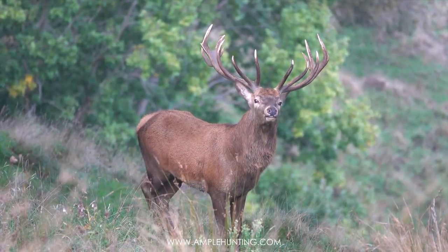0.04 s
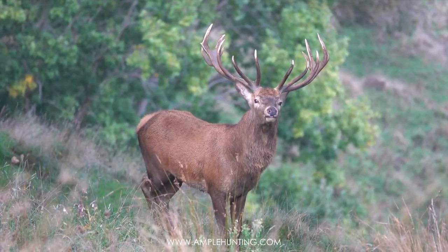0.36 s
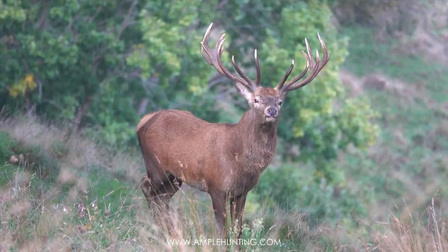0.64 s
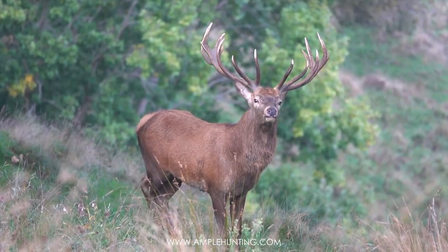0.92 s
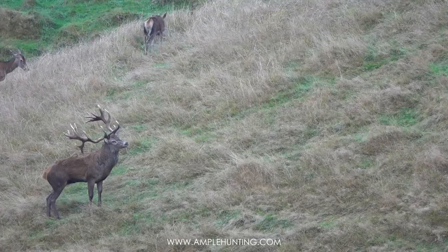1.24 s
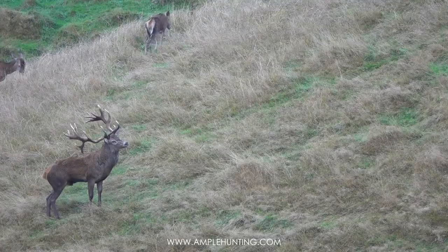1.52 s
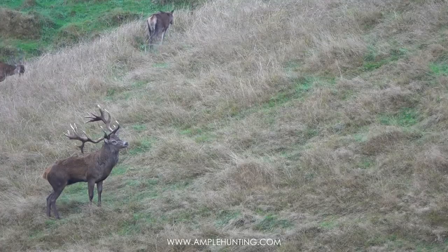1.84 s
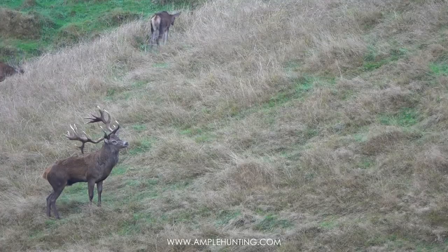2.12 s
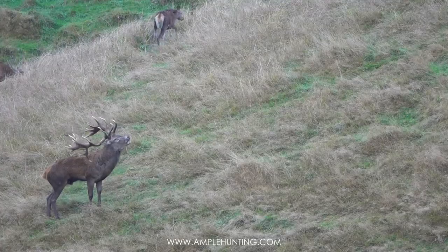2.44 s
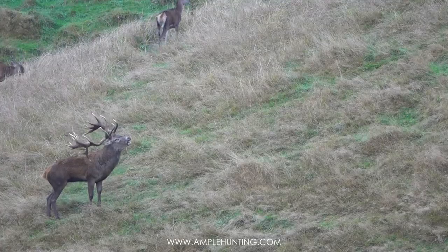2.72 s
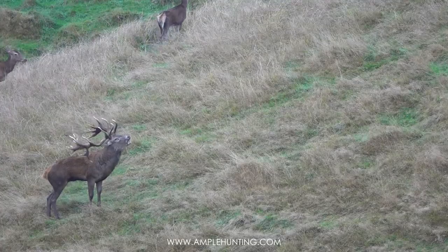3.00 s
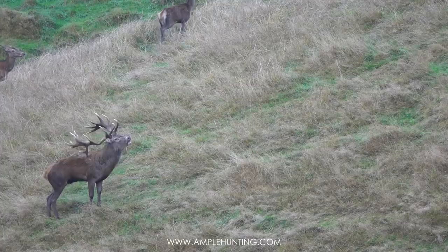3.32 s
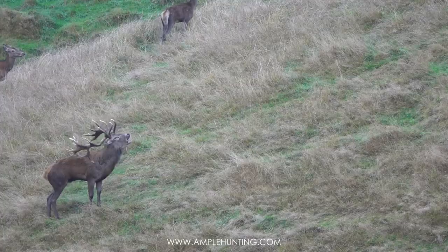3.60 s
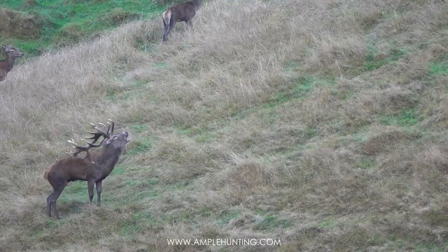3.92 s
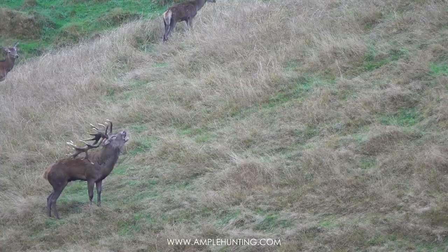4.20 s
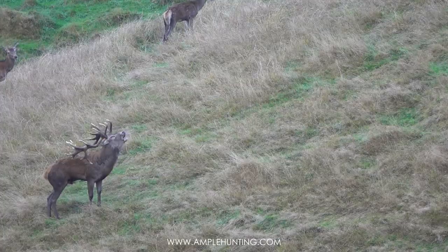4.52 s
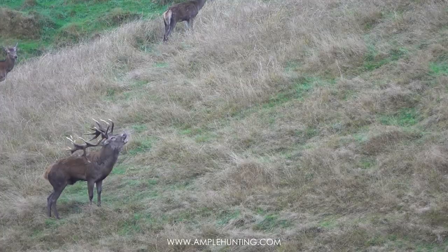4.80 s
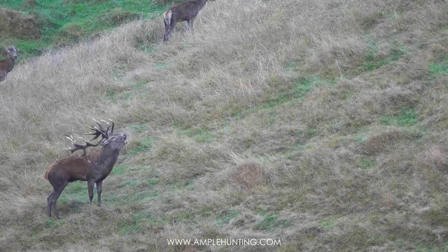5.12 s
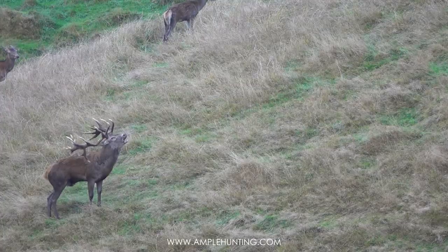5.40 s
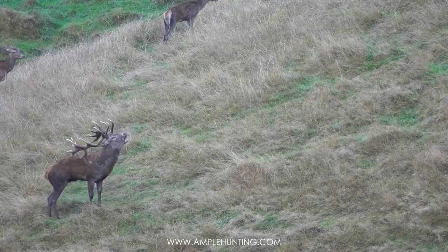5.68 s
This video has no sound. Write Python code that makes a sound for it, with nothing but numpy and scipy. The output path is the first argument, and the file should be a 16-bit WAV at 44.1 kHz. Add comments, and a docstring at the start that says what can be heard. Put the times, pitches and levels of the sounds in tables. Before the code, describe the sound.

At a wood edge, a songbird chirps over a breeze on the microphone and a faint, distant stag. This fades into an open hillside with softly rustling grass, a fluting bird and a very faint high twitter. A nearby red deer stag then gives two loud, harsh grunts and one long, throaty roar, and just begins another.

```python
"""Red deer stag roaring on a hillside.

A breezy wood edge with a chirping songbird and a far stag fades out. An open hillside fades in:
rustling grass, a fluting bird, a thin high twitter. A near stag gives two harsh grunts, one long
roar, and starts another. Uneven pulses of its vocal folds ring a throat that lengthens as it calls.
This stag and the hillside's noise pass through a microphone that rings near 3.4 kHz."""
import sys
import numpy as np
from scipy import signal
from scipy.fft import rfft, irfft, next_fast_len
from scipy.io import wavfile
from scipy.ndimage import map_coordinates

SR = 44100
rng = np.random.default_rng(int(sys.argv[2]) if len(sys.argv) > 2 else 0)


def int16_out(signal):
    """Quantize to a 16-bit WAV file."""
    q = np.round(np.clip(np.atleast_2d(signal).T, -1, 1) * 32767)
    wavfile.write(sys.argv[1], SR, q.astype(np.int16))


N = 253575
T = np.arange(N) / SR
WOOD_END_S, HILL_START_S = 1.295, 1.33


def amp(db):
    """Decibels to gain."""
    return 10 ** (np.asarray(db) / 20)


def unit(x):
    """x at rms 1."""
    return x / np.sqrt(np.mean(x ** 2) + 1e-20)


def during(start, end, attack_s, release_s):
    """Envelope: rises from start, holds at 1, reaches zero at end."""
    return np.clip(np.minimum((T - start) / attack_s, (end - T) / release_s), 0, 1)


def along(points, hz):
    """Gain through (Hz, dB) points on a log axis."""
    point_hz, db = np.transpose(points)
    return amp(np.interp(np.log(hz + 1), np.log(point_hz + 1), db))


def resonances(modes, hz):
    """Gain of steep peaks with faint, wide skirts."""
    return sum(amp(db) / (1 + ((hz - centre) / width) ** 2) ** 2
               + amp(db - 47.5) / (1 + ((hz - centre) / (4 * width)) ** 2)
               for centre, width, db in modes)


def filtered(x, response):
    """x through a zero-phase gain of frequency."""
    size = next_fast_len(N + SR // 2)
    return irfft(rfft(x, size) * response(np.fft.rfftfreq(size, 1 / SR)), size)[:N]


def noise(spectrum):
    """Coloured noise at rms 1."""
    return unit(filtered(rng.standard_normal(N), lambda hz: along(spectrum, hz)))


def wobble(knots_per_s):
    """Smooth random curve."""
    return map_coordinates(rng.standard_normal(int(N * knots_per_s / SR) + 4), [T * knots_per_s])


def steady(x):
    """x with its slow level held at 1; single pulses keep their contrast."""
    window = signal.windows.hann(SR // 18)
    power = signal.fftconvolve(x ** 2, window / window.sum(), "same")
    return x / np.sqrt(np.abs(power) + 1e-12)


def impulses(times_s, sizes):
    """One-sample pulses at the given times."""
    return np.bincount(np.clip(np.round(times_s * SR).astype(int), 0, N - 1), sizes, N)


def outdoors(x, t60_s, wet_db):
    """x plus the diffuse echo of slopes and trees."""
    t = T[:SR]
    tail = rng.standard_normal(SR) * amp(-60 * t / t60_s) * (1 - np.exp(-t / 0.0068))
    return x + amp(wet_db) * signal.fftconvolve(x, tail / np.linalg.norm(tail))[:N]


def slur(start_s, length_s, from_hz, to_hz, db, bend):
    """A note for whistles(); bend is the share of the glide done halfway."""
    return start_s, length_s, from_hz, from_hz + bend * (to_hz - from_hz), to_hz, db


def whistles(notes, flutter):
    """Pure tones, each gliding through three pitches with a random flutter."""
    song = np.zeros(N + SR)
    unsteady = 1 + flutter * wobble(300)
    for start_s, length_s, *pitches_hz, db in notes:
        progress = np.linspace(0, 1, int(length_s * SR))
        at = max(round(start_s * SR), 0)
        span = slice(at, at + len(progress))
        hz = np.polyval(np.polyfit([0, .5, 1], pitches_hz, 2), progress) * unsteady[span]
        envelope = np.sqrt(2 * np.abs(np.sin(np.pi * progress)))
        song[span] += amp(db) * envelope * np.sin(2 * np.pi * np.cumsum(hz) / SR)
    return song[:N]


# Spectra of wind on the microphone and in leaves. Each row: frequency in Hz, relative level in dB.
BUFFET_SPECTRUM = [(7.1, -18), (12, 15.5), (20, 1.5), (30, 0.5), (92, -28), (121, -23.5), (199, -52),
                   (250, -60), (320, -96), (550, -120)]
LEAF_SPECTRUM = [(40, -9.5), (100, 1), (170, -5.5), (240, -12), (600, -16.5), (1100, -17.5), (1500, -27),
                 (2500, -31.5), (4000, -30.5), (6500, -39.5), (15700, -42.5)]

def breeze():
    """Wind buffets the microphone and stirs the leaves."""
    return amp(-24) * noise(BUFFET_SPECTRUM) + amp(-49.5) * noise(LEAF_SPECTRUM)


# Spectra of open air and grass. Each row: frequency in Hz, relative level in dB.
AIR_SPECTRUM = [(20, 0), (100, 4.5), (250, -0.5), (420, -5.5), (540, -0.5), (660, -9.5), (860, -8.5),
                (1150, -12.5), (1600, -33), (2300, -28.5), (2800, -49.5), (4500, -58.5), (8000, -89)]
RUSTLE_SPECTRUM = [(200, -22), (600, -0.5), (1100, -4.5), (1600, -2.5), (2200, -19.5), (2800, -25),
                   (3450, -18.5), (4500, -33.5), (5500, -47.5), (9000, -69)]
# Dips in the background. Each row: time in seconds, air gain in dB, grass gain in dB.
LULLS = [(2.95, 2.5, -0.5), (3.18, -4.5, -15), (3.45, -2.5, -14.5), (3.751, -0.5, -10.5), (5.6, 0, -11)]

def air_and_grass():
    """Open air and rustling grass fade in, drop and partly return."""
    times_s, *gains_db = np.transpose(LULLS)
    air_db, grass_db = (np.interp(T, times_s, db) for db in gains_db)
    air = amp(-45 + air_db + .91 * wobble(6.8)) * noise(AIR_SPECTRUM)
    grass = amp(-52.5 + grass_db + .8 * wobble(17)) * noise(RUSTLE_SPECTRUM)
    age_s = np.maximum(T - HILL_START_S, 0)
    return np.minimum(age_s / 1.39, 1) * air + np.minimum(age_s / 1.32, 1) * grass


def thud(start_s=1.84, ramp_s=.055):
    """One dull bump of low noise."""
    rumble = noise([(40, -12), (75, 1.5), (150, -2), (260, -16), (550, -25), (1200, -48), (4000, -83)])
    return amp(-40) * during(start_s, start_s + 2 * ramp_s, ramp_s, ramp_s) * rumble


# The far stag's throat resonances. Each row: centre in Hz, width in Hz, relative level in dB.
FAR_MODES = [(432, 66, -0.5), (555, 63, -3), (1123, 114, -13)]
# Its roars. Each row: start in seconds, end in seconds, level in dB before the scene's fade.
FAR_ROARS = [(.2, 0.98, -49.5), (.96, 1.9, -51)]

def far_stag():
    """Distant roars: noise shaped by throat resonances."""
    effort = sum(amp(db) * during(start, end, attack_s=.048, release_s=.42)
                 for start, end, db in FAR_ROARS)
    return effort * unit(filtered(rng.standard_normal(N), lambda hz: resonances(FAR_MODES, hz)))


# Runs of twitter. Each row: start in seconds, end in seconds.
TWITTER_RUNS = [(1.59, 2.1), (2.65, 3.2), (3.645, 5.3)]
# Thin whistles. Each row: start in seconds, pitch in Hz, level in dB.
THIN_NOTES = [(3.463, 5790, -93), (3.6, 6000, -86.5), (3.85, 5980, -93), (4.24, 5900, -91.5)]

def high_birds(every_s=.077):
    """Runs of tiny falling notes and a few thin, level whistles."""
    twitter = [(s + rng.normal(0, .002), .018, 6950, 6650, 6350, rng.normal(-87, 2))
               for start, end in TWITTER_RUNS for s in np.arange(start, end, every_s)]
    thin = [slur(s, .099, hz, hz, db, bend=.5) for s, hz, db in THIN_NOTES]
    return outdoors(whistles(twitter + thin, flutter=.008), t60_s=.3, wet_db=-12)


# Fluted notes. Each row: start in seconds, start pitch in Hz, end pitch in Hz, level in dB.
FLUTED_NOTES = [(1.34, 1710, 1534, -74), (1.5, 1845, 1650, -60), (1.68, 1640, 1340, -64),
                (1.753, 1335, 1222, -51.5), (1.85, 1530, 1657, -61.5), (2.141, 1188, 1111, -53),
                (2.349, 1240, 1144, -48), (2.48, 1136, 1100, -54), (2.599, 1256, 1184, -47.5)]

def fluting_bird(note_s=.125):
    """Soft gliding notes echo across the valley."""
    notes = [slur(s, note_s, from_hz, to_hz, db, bend=.8) for s, from_hz, to_hz, db in FLUTED_NOTES]
    return outdoors(whistles(notes, flutter=.0039), t60_s=.64, wet_db=-8)


# Chirps. Each row: start and length in seconds, start and end pitch in Hz, slur and flick level in dB.
SONGBIRD_CHIRPS = [(.012, .04, 3810, 3270, -61.5, -83), (0.013, 0.056, 5440, 4770, -64, -83),
                   (0.079, 0.031, 5100, 4600, -57.5, -80), (0.101, 0.028, 4400, 3070, -58, -95),
                   (.195, 0.029, 3780, 3300, -61.5, -70), (0.27, 0.039, 5530, 3470, -52, -61),
                   (.305, 0.051, 6530, 5500, -67, -85), (0.421, .047, 5610, 3006, -47.5, -54.5),
                   (.56, 0.034, 4100, 3530, -55.5, -72), (.61, 0.013, 3780, 2380, -62, -80),
                   (0.678, 0.025, 3660, 3980, -57, -85), (.702, 0.032, 4500, 2800, -58, -77),
                   (0.823, 0.017, 4570, 2920, -55, -60), (0.849, .04, 3020, 2700, -57.5, -78),
                   (0.96, 0.033, 2160, 3150, -58.5, -74), (1.102, .035, 6800, 5160, -79, -92),
                   (1.2, 0.028, 3940, 3040, -66, -86)]

def songbird(flick_s=.016):
    """Each chirp flicks upward, then slurs to its end pitch among echoing trees."""
    notes = []
    for s, length_s, from_hz, to_hz, slur_db, flick_db in SONGBIRD_CHIRPS:
        notes.append(slur(s - flick_s, flick_s, .66 * from_hz, 1.22 * from_hz, flick_db, bend=.33))
        notes.append(slur(s, length_s, from_hz, to_hz, slur_db, bend=.68))
    return outdoors(whistles(notes, flutter=.03), t60_s=.34, wet_db=-5)


def current_call():
    """Columns of CALLS for the near stag's latest call, per sample."""
    rows = np.array(CALLS)
    return rows[np.searchsorted(rows[1:, 0], T)].T


def course(start, end, tire_s=.5, slacken_s=.13):
    """A call's age in seconds, its tiring (0-1) and the folds' final slackening (0-1)."""
    age_s = np.maximum(T - start, 0)
    tired = 1 - np.exp(-age_s / tire_s)
    slack = np.clip(1 - (end - T) / slacken_s, 0, 1)
    return age_s, tired, slack


# Surges and catches of effort. Each row: time in seconds, change of effort in dB.
EFFORT_SURGES = [(2.862, -4), (2.935, -8.5), (2.989, 2), (3.525, -2), (3.568, 2), (4.628, 3.5), (4.674, -1),
                 (4.824, 4), (4.889, -1.5), (5.28, 2.5)]

def surge_db(half_width_s=.02):
    """Brief bell-shaped changes of effort."""
    return sum(db * np.exp(-((T - s) / half_width_s) ** 2) for s, db in EFFORT_SURGES)


def tension(slack_hz=105.52, sag=.17, lift_per_db=.03):
    """Pitch and roughness: the folds tighten, sag with tiring, then slacken and rattle."""
    start, end, call_hz, call_rough = current_call()[:4]
    age_s, tired, slack = course(start, end)
    tight = np.clip((age_s - .04) / .03, 0, 1) * (1 - .55 * slack)
    held_hz = call_hz * (1 - sag * tired + lift_per_db * surge_db())
    rough = np.clip(call_rough + .08 * tired + .35 * slack, 0, 1)
    return slack_hz + tight * (held_hz - slack_hz), rough


# The hardest single slaps of the folds. Each row: time in seconds, relative level in dB.
FOLD_SLAPS = [(2.878, 6), (2.918, 4), (2.984, 4.5), (3.493, 5), (3.566, 2), (3.581, 8), (3.661, 4.5),
              (3.692, 5.5), (3.989, 1.5), (4.05, 4), (4.098, 3.5), (4.996, 6.5), (5.1, 8.5), (5.377, 4.5)]

def folds(jitter=.26, scatter_db=5, alternate_db=3, waver=.012, turbulence=.62, tone=.64):
    """One pulse per cycle; the rougher the voice, the more uneven their timing and size."""
    pitch_hz, rough = tension()
    cycles = np.cumsum(pitch_hz * (1 + waver * wobble(35))) / SR
    at = np.flatnonzero(np.diff(np.floor(cycles)))
    late, size = rng.standard_normal((len(at), 2)).T
    # strained folds alternate strong and weak closures
    size_db = scatter_db * (np.clip(size, -2, 1.5) - .5) + alternate_db * (-1) ** np.arange(len(at))
    pulses = impulses(T[at] + jitter * rough[at] * late / pitch_hz[at], amp(rough[at] * size_db))
    slap_s, slap_db = np.transpose(FOLD_SLAPS)
    pulses += impulses(slap_s, amp(slap_db + 1))
    # each opening lets through a turbulent puff
    puff = np.exp(-T[:SR // 50] / .003)
    puffs = signal.fftconvolve(pulses, puff / np.linalg.norm(puff))[:N] * rng.standard_normal(N)
    # the folds' smooth swing carries two clean harmonics
    harmonics = .5 * np.cos(2 * np.pi * cycles) + np.cos(4 * np.pi * cycles)
    swing = 2 * pitch_hz / SR * (1 - rough) * harmonics
    return pulses + turbulence * puffs + tone * swing


def larynx(high=1.042, low=.98):
    """Factor on the resonances: the larynx sinks through each call and lengthens the throat."""
    _, tired, _ = course(*current_call()[:2])
    return high + (low - high) * tired


# Spectrum of the fold pulses. Each row: frequency in Hz, gain in dB.
PULSE_SPECTRUM = [(40, -16.5), (110, 1.5), (1700, -5), (2000, 0), (3000, 1.5), (4400, -1), (5500, 0.5),
                  (8000, -37)]

def throat(source, modes, size=8192):
    """Minimum-phase ringing of the throat, on a clock that slows as the throat lengthens."""
    hz = np.fft.rfftfreq(size, 1 / SR)
    cepstrum = irfft(np.log(resonances(modes, hz) * along(PULSE_SPECTRUM, hz) + 1e-6))
    causal = np.r_[cepstrum[0], 2 * cepstrum[1:size // 2]]
    ring = irfft(np.exp(rfft(causal, size)))
    clock = np.cumsum(larynx())
    warped = np.interp(np.arange(int(clock[-1])), clock, source)
    return map_coordinates(signal.fftconvolve(warped, ring), [clock])


def call(voice, row, rush_db, shut_db=0, attack_s=.0028, mouth_opens_s=.11, split_hz=620):
    """Effort swells, trembles and tires; a wider mouth lets out more treble; air rushes out too."""
    start, end, _, _, level_db, bright_db, swell_s, fade_db = row
    age_s, tired, slack = course(start, end)
    swell_left = np.maximum(1 - (age_s / swell_s) ** 1.47, 0)
    effort_db = level_db - 11.5 * swell_left - 6.5 * tired - fade_db * slack
    shut = np.maximum(1 - age_s / mouth_opens_s, 0)
    mouth_db = bright_db - shut_db * shut - 6 * tired - .45 * fade_db * slack
    low = filtered(voice, lambda hz: 1 / (1 + (hz / split_hz) ** 16))
    chest = amp(surge_db() + .63 * wobble(18)) * steady(low)
    mouth = amp(mouth_db + .28 * surge_db() + 1.2 * wobble(25)) * steady(voice - low)
    rush = amp(rush_db) * noise(RUSTLE_SPECTRUM)
    return during(start, end, attack_s, release_s=.026) * amp(effort_db) * (chest + mouth + rush)


# Throat resonances. Each row: centre and width in Hz before the larynx factor, relative level in dB.
OPENING_MODES = [(97, 26, -4), (181, 23, 1), (295.2, 92, 3), (494, 60, -5), (578, 50, -9), (748, 100, -5),
                 (996, 70, -11), (1170, 79, -12.5), (1425, 320, -25), (1880, 26, -26.5),
                 (3480, 1300, -62.5)]  # mouth opening
GRUNT_MODES = [(190, 87, -14.5), (329, 104, 1.5), (482, 46, -18.5), (930, 107, -4.5), (1090, 24, -15),
               (1420, 126, -10), (1580, 72, -18.5), (1752, 94, -19.5), (1740, 49, -30), (2010, 120, -36),
               (2370, 100, -45), (4970, 490, -70)]
ROAR_MODES = [(102.3, 14, -25.5), (184.8, 48, -11), (255, 60, -18.5), (359.3, 62, 3.5), (409.6, 36, -9),
              (469, 23.3, -2), (714, 74, -17), (834.3, 38, 1), (920, 5.9, -11), (993, 52, -12.5),
              (1077, 160, -22), (1233.1, 74, -15.5), (1525, 116, -13), (1639.3, 91, -16.5), (2030, 85, -36),
              (2310, 35, -44), (2476, 64, -46), (2740, 30, -53), (3570, 590, -80.5), (4400, 230, -69.5)]  # neck stretched
FRESH_MODES = [(189.3, 30, -14.5), (1388, 43, -8)]  # lost as the long roar tires
CHEST_MODES = [(101, 27, -16.5), (209, 57, -2.5), (866, 22, -5)]  # extra ringing of the pushed second grunt
# The near stag's calls. Each row: start and end in seconds, base pitch in Hz, base roughness 0-1,
# base level in dB, brightness in dB, swell in seconds, final fade in dB (negative rises).
CALLS = [(2.819, 3.134, 173.8, .24, -18, -8, 0.079, 8.5),
         (3.466, 3.716, 116.1, 0.91, -21, -7.5, 0.059, 0.5),
         (3.988, 5.404, 197.9, .34, -16.5, -4.5, .024, -0.9),
         (5.713, 5.9, 112, 0.31, -22.5, -13.5, 0.031, -5)]

def stag():
    """The folds drive the throat: two grunts, the long roar and the start of the next."""
    source = folds()
    opened = np.interp(T, [2.9, 2.95], [0, 1])
    fresh = np.interp(T, [4.3, 4.75], [1, 0])
    grunt = (1 - opened) * throat(source, OPENING_MODES) + opened * throat(source, GRUNT_MODES)
    roar = throat(source, ROAR_MODES) + fresh * throat(source, FRESH_MODES)
    first, second, held, last = CALLS
    calls = (call(grunt, first, rush_db=-41, attack_s=.024)
             + call(roar + throat(source, CHEST_MODES), second, rush_db=-35)
             + call(roar, held, rush_db=-40.5, shut_db=9)
             + call(roar, last, rush_db=-30.5, attack_s=.0097))
    return outdoors(calls, t60_s=.14, wet_db=-13.5)


# Treble resonances of the hillside microphone. Each row: centre in Hz, width in Hz, gain in dB.
MICROPHONE_MODES = [(3459, 430, 26.5), (6830, 850, 17)]

def microphone(x):
    """The microphone rings in the treble and passes the rest unchanged."""
    return filtered(x, lambda hz: np.hypot(1, resonances(MICROPHONE_MODES, hz)))


def scene():
    """The wood edge, then the hillside."""
    end_fade = np.clip((T[-1] - T) / .005, 0, 1)
    hillside = microphone(end_fade * (stag() + air_and_grass() + thud()))
    wood_fade = np.clip(WOOD_END_S - T, 0, 1) ** .71  # over its last second
    wood_gate = during(0, WOOD_END_S, attack_s=.0039, release_s=.013)
    wood_edge = wood_gate * (wood_fade * (breeze() + far_stag()) + songbird())
    return (wood_edge + hillside + fluting_bird() + high_birds())[None]


def record(dry, hiss_db=-100, top_hz=15700):
    """The camera adds a trace of hiss and keeps nothing above its band limit."""
    return np.array([filtered(channel + amp(hiss_db) * rng.standard_normal(N), lambda hz: hz < top_hz)
                     for channel in dry])


dry = scene()
out = record(dry)
int16_out(out)
```